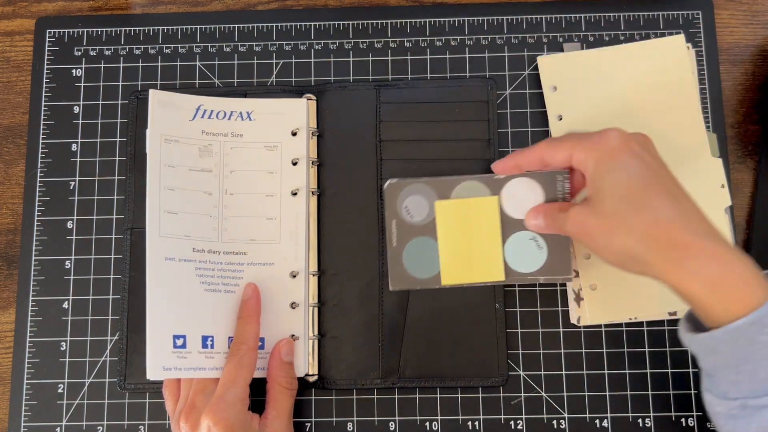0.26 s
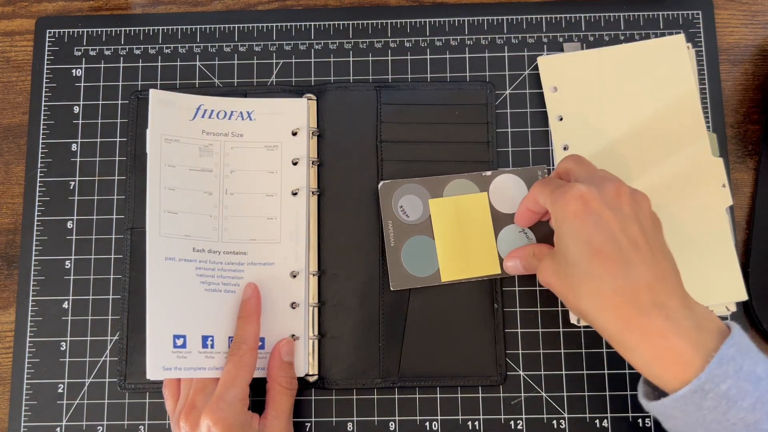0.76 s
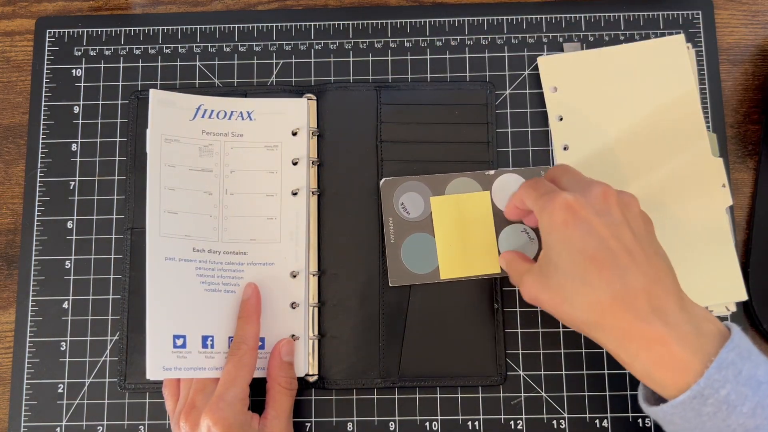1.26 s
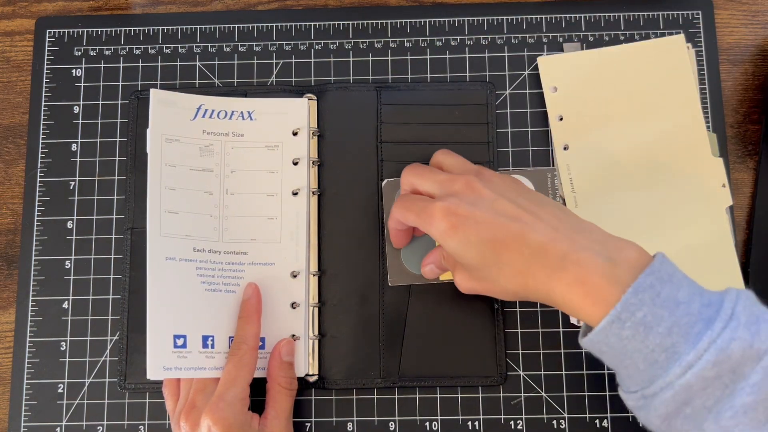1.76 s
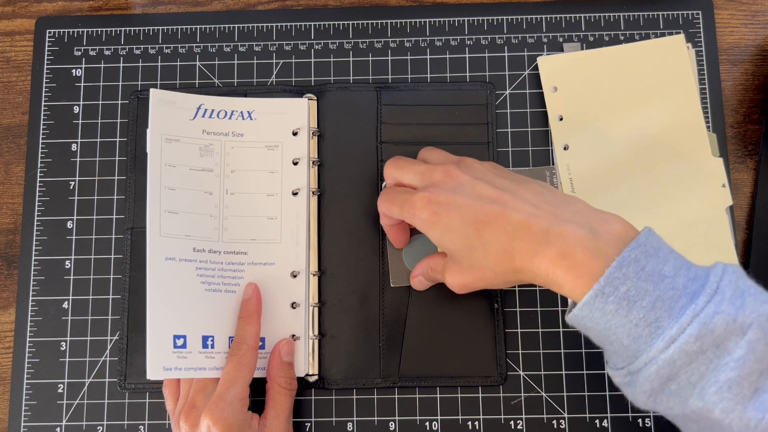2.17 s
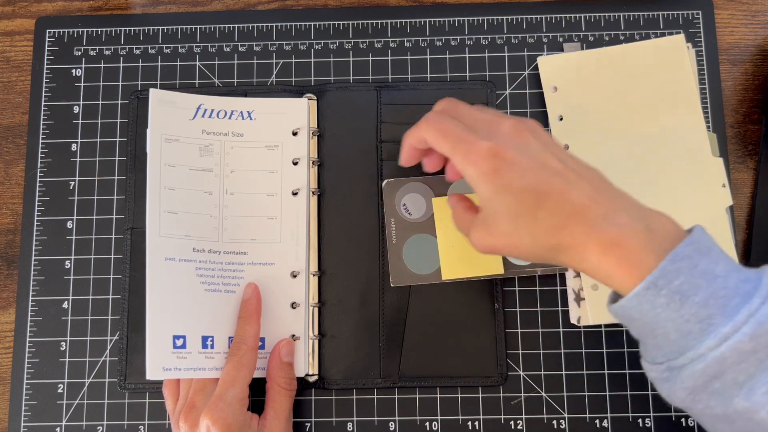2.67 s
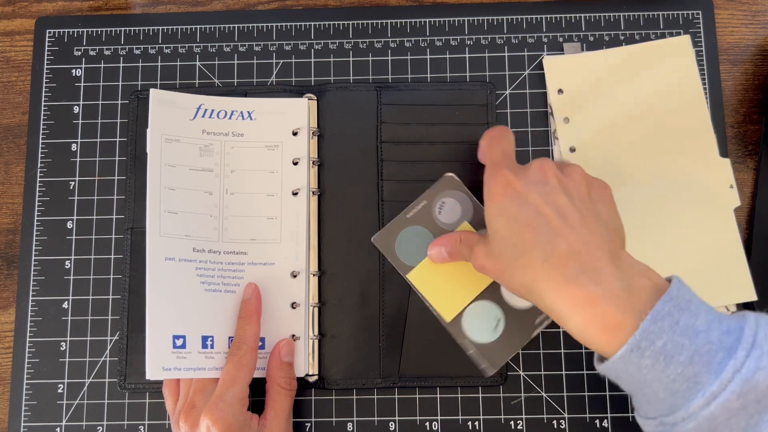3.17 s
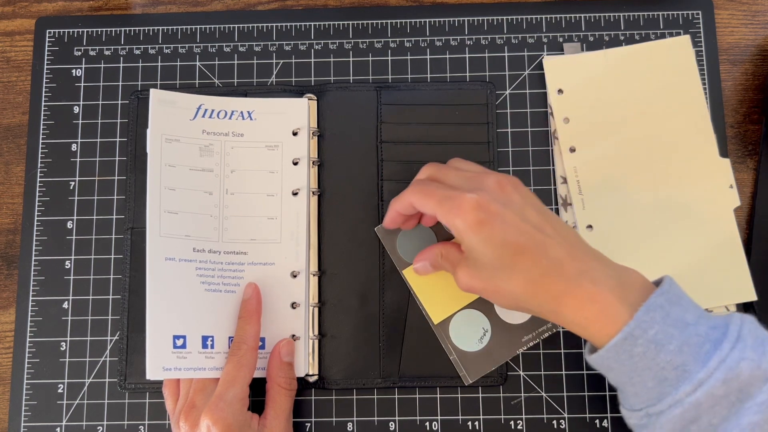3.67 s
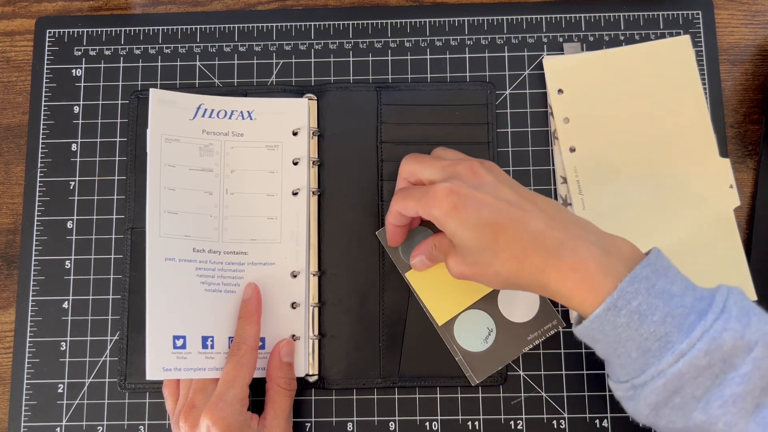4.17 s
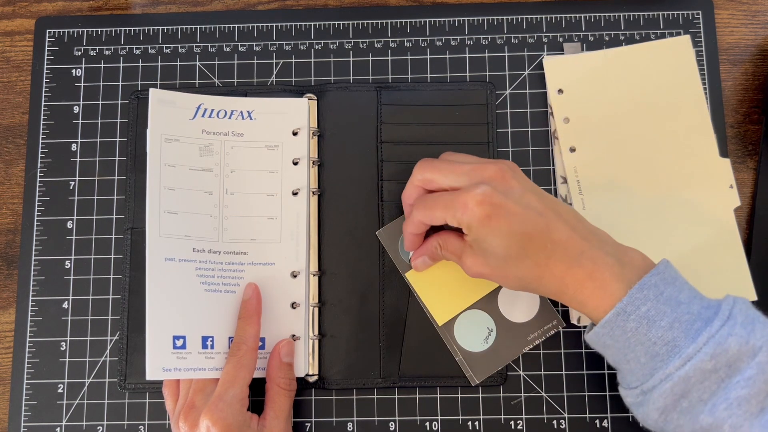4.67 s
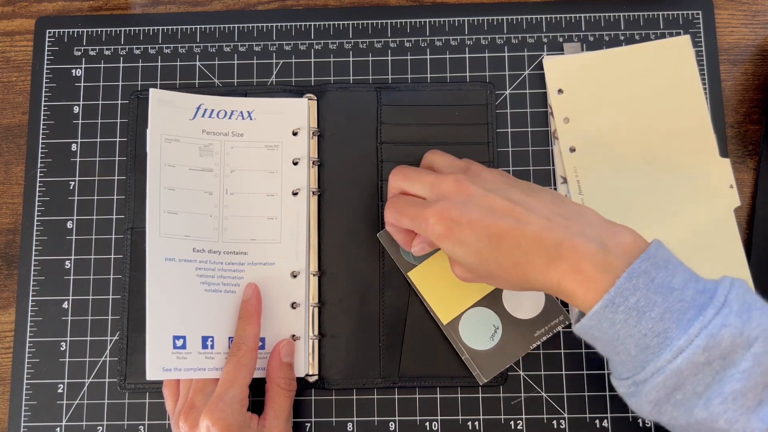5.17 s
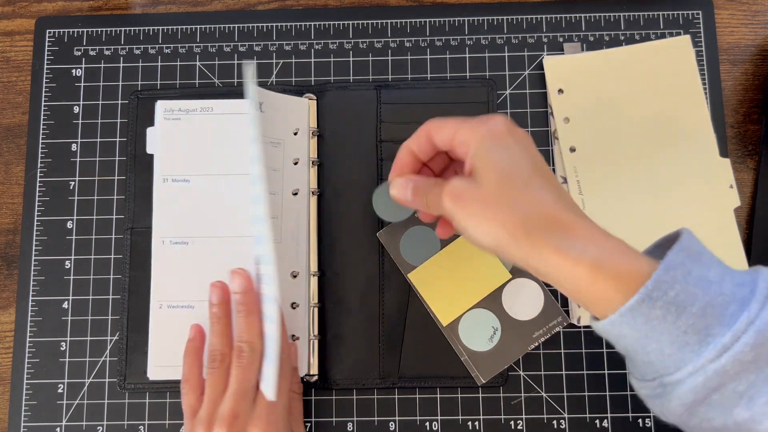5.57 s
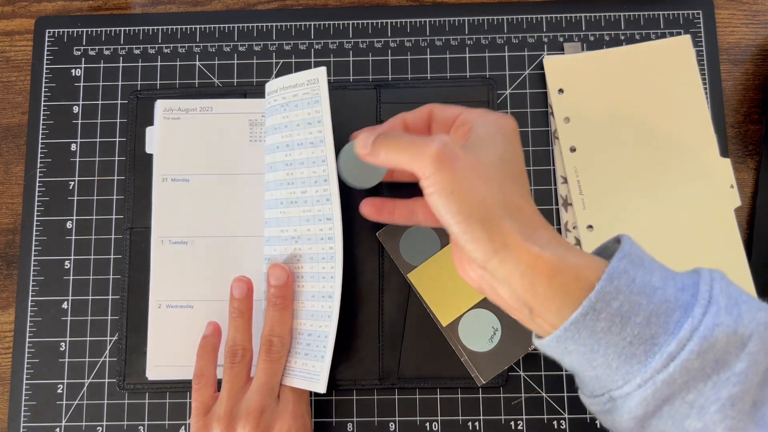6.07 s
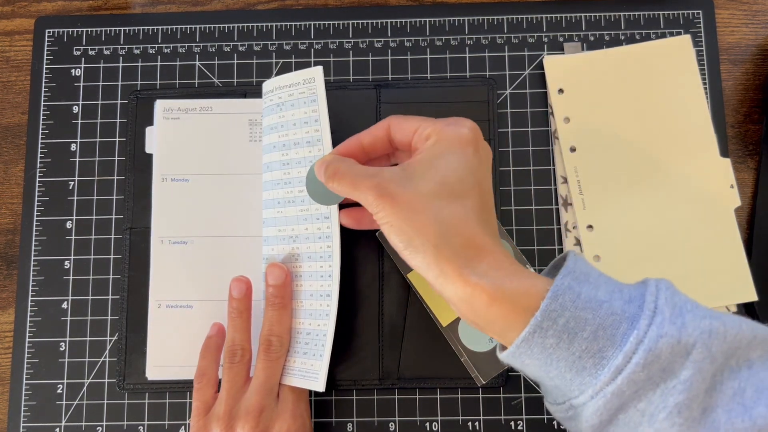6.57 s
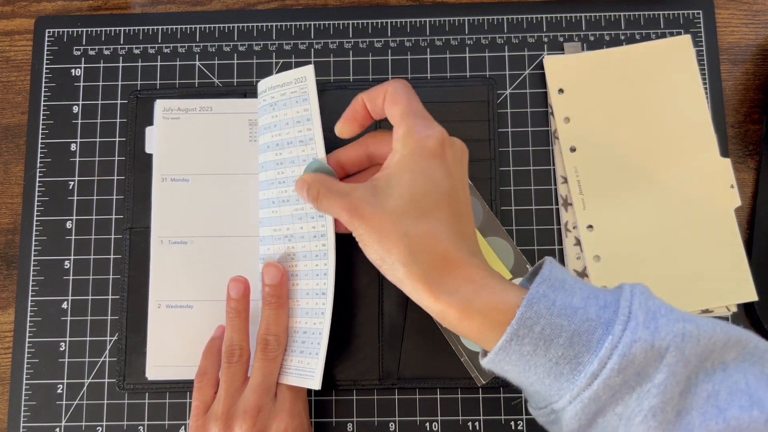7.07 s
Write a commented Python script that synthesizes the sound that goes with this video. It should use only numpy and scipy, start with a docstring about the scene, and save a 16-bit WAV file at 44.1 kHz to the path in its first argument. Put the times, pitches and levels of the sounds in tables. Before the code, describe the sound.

Light plastic clicks open, then sparse nail ticks and soft skin-on-card rustles. Around the middle the picking grows busier, with a bright snap, and shortly after five seconds the loudest cluster of crisp snaps and papery swishes marks peeling and page turning. It ends in gentle rubbing. Close microphones, small quiet room, constant low hum and faint hiss.

```python
"""Sticky tabs and paper on a desk

Fingers slide a plastic card of sticky tabs over a desk, pick at the tabs and turn paper pages.
Nails and edges snap: short bursts of force ring decaying modes. Skin and paper rub: coloured noise
swells and fades. A mains hum and a low room rumble stand under it all.
The two microphone ports hear the top of the treble in opposite phase."""
import sys
import numpy as np
from scipy import signal
from scipy.fft import rfft, irfft, next_fast_len
from scipy.io import wavfile
from scipy.ndimage import uniform_filter1d

SR = 44100
rng = np.random.default_rng(int(sys.argv[2]) if len(sys.argv) > 2 else 0)


def materialize(psi):
    """Save the field psi as 16-bit PCM at rate SR to the path in sys.argv[1].

    A 1-D psi becomes a single channel; in a 2-D psi each row is a channel.
    """
    bounded = np.clip(np.atleast_2d(psi).T, -1, 1)
    quanta = np.round(bounded * 32767).astype(np.int16)
    wavfile.write(sys.argv[1], SR, quanta)


N = 322672  # length [samples]
SIZE = next_fast_len(N + SR)  # FFT length, with spare room at the end
HZ = np.maximum(np.arange(SIZE // 2 + 1) * SR / SIZE, 1)  # pitch of each FFT bin


def amp(db):
    """Turn decibels into gain."""
    return 10 ** (np.asarray(db) / 20)


def rms_one(x):
    """Scale to unit rms."""
    return x / np.sqrt(np.mean(x ** 2) + 1e-20)


def on_grid(points):
    """Read a table of (frequency, value) at every FFT bin, straight lines over log frequency."""
    hz, value = np.transpose(points)
    return np.interp(np.log(HZ), np.log(hz), value)


def drift(rate_hz):
    """Smooth random wandering with spread 1: white noise through a two-pole low-pass."""
    r = np.exp(-2 * np.pi * rate_hz / SR)
    noise = rng.standard_normal(N + SR)
    wander = signal.lfilter([1], [1, -2 * r, r * r], noise)
    return rms_one(wander[SR:])  # skip the filter's start


def spread(common, apart, likeness):
    """Build left and right spectra from a shared part and a part with opposite sign in each ear."""
    alike = np.clip(on_grid(likeness), -1, 1)
    shared = np.sqrt((1 + alike) / 2) * common
    opposite = np.sqrt((1 - alike) / 2) * apart
    return shared + opposite * [[1], [-1]]


# Steady tones of the mains hum: (frequency [Hz], rms level [dB])
HUM_LINES = [(119.7, -42), (72.3, -70.5), (167.5, -73.5), (240, -72.5), (351.8, -76), (450, -81.5),
             (465, -82.5)]


def hum():
    """Mains hum: steady sine tones whose levels waver a little, each by itself."""
    t, out = np.arange(N) / SR, 0
    for hz, level_db in HUM_LINES:
        tone = np.sqrt(2) * np.sin(2 * np.pi * (hz * t + rng.random()))
        waver_db = 0.36 * drift(8.0)
        out = out + tone * amp(level_db + waver_db)
    return out


# Rumble and hiss of the quiet room: (frequency [Hz], level per Hz [dB])
ROOM_COLOUR = [(20, -106), (50, -84), (130, -78), (200, -90), (340, -91.5), (400, -97), (480, -95),
               (700, -104), (1400, -115), (2500, -122), (5000, -127), (8000, -126), (10000, -131),
               (13500, -133), (15000, -145)]
# How alike the room is in both ears: (frequency [Hz], likeness [1 same, 0 unrelated, -1 opposite])
ROOM_LIKENESS = [(40, 1), (150, 1), (200, .85), (300, 0.5), (450, 0), (700, -.5), (1200, .0), (2000, 0.2),
                 (5200, 0.06), (6000, 1), (8000, 0.5), (9500, 0)]


def room_tone():
    """Quiet room: smooth stereo noise, coloured by its table."""
    noise = rfft(rng.standard_normal((2, SIZE)))
    common, apart = noise * amp(on_grid(ROOM_COLOUR)) * np.sqrt(SR / 2)
    return irfft(spread(common, apart, ROOM_LIKENESS), SIZE)[:, :N]


# Slides of skin, card and paper that swell, hold and fade: (time of full pressure [s],
# time to gain 30 dB [s, at least 0.006], hold [s], time to lose 30 dB [s, at least 0.04],
# drag level [dB], scuff level [dB], hiss level [dB], air level [dB],
# drag pitch [Hz], scuff pitch [Hz], breadth [octaves])
SLIDES = [(.01, -11, 0.29, 0.3, -76, -94, -103, -95, 1300, 2400, 0.9),
          (0.244, 0.18, 0.074, 0.04, -71.5, -69.5, -67, -62.5, 1430, 3170, 0.42),
          (0.64, 0.1, .005, 0.07, -69, -65, -66.5, -84, 1180, 3460, 0.54),
          (0.73, 0.24, 0.009, 0.08, -93, -67, -76.5, -79, 1370, 3400, 0.29),
          (1.0, .02, 0.035, 0.05, -94, -74, -89.5, -93.5, 1420, 3450, .17),
          (1.268, 0.06, 0.018, 0.06, -85, -57, -64.5, -63, 1910, 3320, 0.18),
          (1.319, 0.32, 0.0069, 0.17, -93, -77, -82, -86.5, 1500, 3440, 0.2),
          (1.569, -0.14, 0.04, 0.09, -75, -75.5, -69, -70.5, 1090, 3800, 0.65),
          (1.633, -0.52, 0.026, 0.12, -68.5, -73.5, -78, -76, 1080, 3650, .43),
          (2.004, 0.04, 0.042, 0, -91, -88.5, -86, -74, 1100, 4470, 0.41),
          (2.223, 0.11, 0.018, 0.13, -72, -73.5, -67, -88, 1060, 4160, 0.75),
          (2.286, 0.25, 0.018, -0.55, -72, -76.5, -76, -74.5, 1090, 3750, 0.58),
          (2.462, 0.76, 0.032, 0.3, -91, -80.5, -101, -83, 1110, 3860, 0.35),
          (2.562, 0.3, .003, 0.04, -72.5, -81, -82, -76, 1290, 3040, 0.33),
          (2.848, 0.24, 0.035, 0.5, -77, -82.5, -84, -81, 1220, 3720, 0.33),
          (2.9, 0.12, 0.033, 0.16, -72, -73.5, -67, -65.5, 1360, 3700, 0.42),
          (3.055, 0.05, 0.041, 0.2, -70.5, -68.5, -64.5, -62, 1256, 3600, 0.38),
          (3.116, 0.24, 0.022, -0.27, -69, -78, -90.5, -89, 1050, 3800, 0.8),
          (3.179, .1, 0.076, -0.16, -72.5, -79, -71.5, -73, 1020, 4200, 0.52),
          (3.637, -0.13, 0.029, -0.02, -73, -79.5, -73, -75, 1000, 3460, 0.41),
          (3.772, 0, 0.016, 0.06, -78, -79, -73.5, -68, 1020, 4190, 0.42),
          (3.908, -0.21, 0.015, -1, -69, -78.5, -73, -82, 1250, 3040, 0.34),
          (4.254, -0.27, .015, -2.1, -73, -86, -84, -81.5, 1240, 3000, 0.24),
          (4.315, 0.03, 0.065, 0.15, -74, -74.5, -76, -70, 1180, 3560, 0.35),
          (4.642, -0.01, 0.018, 0.12, -65.5, -67, -64, -63.5, 1110, 4700, 0.39),
          (4.773, 0.15, 0.0038, -0.05, -67.5, -69, -65, -57, 1100, 4250, 0.43),
          (4.819, 0.03, 0.0027, 0.08, -73, -74.5, -60, -62.5, 1120, 4830, 0.46),
          (4.969, 0.4, 0.031, 0.6, -81.5, -93.5, -82.5, -75, 1040, 3520, 0.23),
          (5.138, 0.1, 0.0087, 0.04, -78, -70, -63.5, -62, 1500, 3930, 0.69),
          (5.279, 0.22, 0.0038, 0.03, -68.5, -67, -63, -59, 1355, 3290, 0.6),
          (5.416, 0.04, 0.0094, 0, -64, -62, -55, -55.5, 1120, 3470, 0.74),
          (5.444, 0.22, 0.074, -0.1, -64.5, -77.5, -77, -82, 960, 3200, 0.48),
          (5.666, 0.54, 0.0028, -0.08, -73.5, -79.5, -73, -74, 1070, 4480, 0.66),
          (5.9, 0.3, 0.025, 0, -72, -72, -70, -65, 1510, 3300, 0.47),
          (6.343, 0.02, 0.011, 0.08, -68.5, -76, -67.5, -61, 1110, 3460, 0.74),
          (6.752, -0.9, 0.021, 0, -80, -99, -94.5, -85, 1400, 2900, 0.44),
          (6.572, 0.5, 0.0032, -0.3, -82.5, -92, -87.5, -83.5, 1510, 2650, 0.45),
          (6.684, 0.15, 0.023, 0.05, -77.5, -86.5, -88, -78.5, 1590, 2900, 0.24),
          (6.939, 0.05, 0.019, 0.6, -70.5, -75.5, -70.5, -67.5, 1440, 3200, 0.65),
          (7.056, 0.15, 0.084, -0.9, -74, -74, -65.5, -62, 1780, 3080, 0.55),
          (7.292, 0.04, .04, -10, -71, -73, -67, -64, 1690, 3070, 0.4)]
# Rustles that a snap sets off at once and that die away: (time [s],
# time to lose 30 dB [s, at least 0.04], drag level [dB], scuff level [dB], hiss level [dB],
# air level [dB], drag pitch [Hz], scuff pitch [Hz], breadth [octaves])
RUSTLES = [(0.342, 0.09, -70, -60, -68, -81, 1230, 3320, 0.72),
           (0.578, -0.02, -81, -72, -63, -85, 1180, 3410, .4),
           (1.11, 0.21, -64.5, -66.5, -74.5, -75, 990, 3450, 0.45),
           (1.519, 0.16, -63.5, -68, -67.5, -79, 1190, 3160, 0.5),
           (2.187, -0.21, -57, -68, -56, -73, 1050, 4230, 0.3),
           (2.389, 0, -77, -96, -74, -96, 980, 4110, 0.44),
           (2.767, 0.35, -76.5, -79, -92, -75.5, 1020, 3750, 0.57),
           (3.619, 0.06, -73, -85.5, -73, -74, 980, 3360, 0.49),
           (3.918, 0.28, -67, -79, -81, -71, 1090, 4240, 0.25),
           (4.04, 0.05, -52.5, -79, -71, -59, 1130, 4500, 0.099),
           (4.094, 0.1, -59.5, -82.5, -76, -64.5, 1040, 3590, 0.17),
           (4.273, 0.18, -70, -60.5, -65, -67, 1210, 3450, 0.56),
           (4.39, 0.06, -90, -78, -74, -67, 1130, 3480, 0.49),
           (5.098, 0.0546, -56.5, -48.5, -45, -49, 1850, 3950, 0.48),
           (5.284, .17, -51, -56, -56, -59, 960, 3520, 0.59),
           (5.553, -0.3, -74, -75, -73, -83, 990, 4000, 0.68),
           (5.722, -0.13, -63.5, -82, -83, -73, 1170, 3550, 0.76),
           (5.754, 0.12, -59.5, -63.5, -62, -55.5, 1210, 3290, 0.88),
           (5.914, 0.25, -69, -74.5, -80.5, -78, 1020, 3950, .06),
           (6.889, 0.5, -74, -84, -80, -67.5, 1520, 2750, 0.46)]


def pressure(s):
    """Power of each rustle and slide at the times s, 1 at full pressure, plus their colour columns."""
    rustle_rise_s, rustle_hold_s = 0.012, 0
    rustles = [(at, rustle_rise_s, rustle_hold_s, *rest) for at, *rest in RUSTLES]
    rows = np.array(rustles + SLIDES)
    at, rise, hold, fall = rows[:, :4].T[:, :, None]
    rise, fall = np.maximum(rise, .006), np.maximum(fall, .04)  # nothing starts or stops dead
    before, after = np.maximum(at - s, 0), np.maximum(s - at - hold, 0)
    db = -30 * (before / rise + after / fall)
    return amp(2 * np.maximum(db, -600)), rows[:, 4:].T


# How alike rubbing and echo are in both ears: (frequency [Hz], likeness [1 same, 0 unrelated])
RUB_LIKENESS = [(500, 0.24), (1000, 0.099), (1500, 1), (2800, 0.78), (3600, 0.91), (5200, 0.3), (6000, 1),
                (8000, 1), (16000, 1)]


def slips(colour, grain_db, crackle):
    """Dense slips of uneven size in one colour, with lone larger catches among them, rms 1."""
    catches_per_s = 220
    grains = rng.standard_normal((2, N)) * amp(grain_db * drift(440))
    caught = rng.random(N) < catches_per_s / SR
    grains[0] *= 1 + crackle * caught
    common, apart = rfft(grains, SIZE) * amp(on_grid(colour))
    return rms_one(irfft(spread(common, apart, RUB_LIKENESS), SIZE)[:, :N])


def focus(x, s, centre_hz, breadth):
    """A resonance that moves with the free length of card; it keeps the loudness."""
    hz, t, cells = signal.stft(x, SR, nperseg=256)
    octaves = np.maximum(np.interp(t, s, breadth), .04)
    centre = np.interp(t, s, centre_hz)
    off = np.log2(np.maximum(hz[:, None], 1) / centre) / octaves
    bump = 1 / np.sqrt(1 + off ** 4)
    mean_power = np.mean(np.abs(cells) ** 2, axis=(0, 2))[:, None]
    power_kept = np.sum(mean_power * bump ** 2, axis=0) / np.sum(mean_power)
    bump /= np.sqrt(power_kept)
    return signal.istft(cells * bump, nperseg=256)[1][:, :N]


# Colour of each kind of rubbing, low to high: (frequency [Hz], relative level per Hz [dB])
DRAG_COLOUR = [(350, -34.5), (650, 5), (900, 1), (2100, -1), (2500, -3.5), (3200, -43)]
SCUFF_COLOUR = [(1500, -42), (2200, 2.5), (3400, -4), (4600, -1), (5100, -7.5), (6500, -37)]
HISS_COLOUR = [(4200, -45), (5300, 5), (5800, 3.5), (6800, 3.5), (8500, 3.5), (9500, -2), (11500, -43.5)]
AIR_COLOUR = [(7000, -37.5), (9000, -5), (11000, 5.5), (14500, -0.5), (15800, -2), (16200, -42.5)]


def rubbing(flutter_db, scratch_db):
    """Drag, scuff, hiss and air add the power of all contacts; louder ones steer pitch and breadth."""
    s = np.arange(0, N / SR + .001, .001)
    power, (*levels, drag_hz, scuff_hz, octaves) = pressure(s)
    shares = [amp(2 * level_db)[:, None] * power for level_db in levels]

    def blend(share, value):
        """Average over the contacts, weighted by their power."""
        return np.sum(share * value[:, None], axis=0) / np.sum(share, axis=0)

    drag = slips(DRAG_COLOUR, grain_db=0.5, crackle=6)
    drag = focus(drag, s, blend(shares[0], drag_hz), blend(shares[0], octaves))
    scuff = slips(SCUFF_COLOUR, grain_db=0.5, crackle=6)
    scuff = focus(scuff, s, blend(shares[1], scuff_hz), blend(shares[1], octaves))
    hiss = slips(HISS_COLOUR, grain_db=1.0, crackle=6)
    air = slips(AIR_COLOUR, grain_db=1.5, crackle=4.7)
    t, out = np.arange(N) / SR, 0
    for layer, share in zip((drag, scuff, hiss, air), shares):
        loudness = np.sqrt(np.sum(share, axis=0))
        out = out + layer * np.interp(t, s, loudness)
    # flutter and scratches catch all colours at once
    stroke = amp(flutter_db * drift(30)) * rms_one(amp(scratch_db * drift(160)))
    return stroke * out


def patchy(x, patch_db):
    """The contact keeps changing shape, so narrow bands swell and fade by chance."""
    cells = signal.stft(x, nperseg=256)[2]
    field = rng.standard_normal(cells.shape[1:])
    field = uniform_filter1d(field, size=3, axis=0)  # over neighbouring bands
    field = uniform_filter1d(field, size=25, axis=1)  # over time
    return signal.istft(cells * amp(patch_db * rms_one(field)), nperseg=256)[1][:, :N]


def ring(force, hz, t60):
    """One decaying mode for each row of force, at a pitch of its own: a two-pole resonator."""
    r, w = amp(-60 / (t60 * SR)), 2 * np.pi * hz[:, None] / SR
    back = np.exp(-2j * np.pi * np.arange(2049) / 4096)  # a delay of one sample
    response = np.sin(w) * back / (1 - 2 * r * np.cos(w) * back + (r * back) ** 2)
    return irfft(rfft(force, 4096) * response, 4096)


# Snaps of nail, card and page: (time [s], thud peak [dB], card peak [dB], crack peak [dB],
# thud pitch [Hz], card pitch [Hz], crack pitch [Hz], burst length [ms],
# optional: fall-off of thud and card modes away from the pitch [dB per octave])
SNAPS = [(0.165, -68, -58.5, -64, 1010, 2242, 7420, 6.3),
         (0.336, -49, -33, -33.5, 1620, 3130, 5650, 0.8, 14),
         (0.341, -56.5, -37, -39, 1010, 3400, 6800, 0.8), (0.346, -48.5, -44, -49, 1010, 3199, 6800, 1.5),
         (0.386, -67, -75, -53.5, 770, 2220, 6939, 2), (0.588, -66, -55, -51, 1000, 2980, 6500, 1.5),
         (0.633, -66, -52, -63, 1000, 3120, 6038, 1), (0.573, -49, -36, -39, 1050, 2400, 5530, 1, 7),
         (0.605, -56, -54, -59, 832, 3800, 5820, 1.3), (0.623, -53, -35, -41, 1020, 3323, 6970, 1, 18),
         (0.65, -51.5, -42, -52, 810, 3480, 6140, 1), (0.696, -61.5, -61, -55, 1010, 2360, 7600, 1.7),
         (0.953, -80, -66, -73, 783, 3329, 6260, 1.6), (1.11, -37, -36.5, -44.5, 1316, 3500, 5900, 1.5, 9),
         (1.112, -43, -48, -69, 320, 3460, 5600, 2, 8), (1.266, -78, -49, -71, 751, 3356, 6500, 1.2),
         (1.279, -72, -49.5, -45.5, 751, 3330, 6430, 2.8), (1.285, -81, -53, -62, 751, 3400, 6400, 3, 20),
         (1.296, -78, -62, -44, 751, 3510, 6360, 1.5), (1.318, -76, -77, -55.5, 861, 3360, 6890, 3.3),
         (1.518, -49.5, -52, -54, 1040, 3610.5, 6852, 4.1), (1.607, -49, -46, -49, 1050, 4150, 5740, 2.5),
         (1.652, -52.5, -53.5, -50, 959, 2730, 6700, 4.2),
         (2.182, -39, -35, -24.5, 1240, 4004, 6878, .8, 3), (2.196, -52, -56, -48, 1200, 4200, 7000, 2),
         (2.385, -51, -50.5, -46, 910, 3800, 7640, 1.64), (2.545, -61, -64, -59, 1180, 2420, 5770, 1.5),
         (2.763, -57, -74, -67, 1110, 2530, 5399.5, 3.9), (2.905, -55.5, -72, -55, 1140, 3301, 5500, 2.3),
         (2.924, -82, -56, -72, 1460, 2150, 6550, 1.6), (2.981, -64, -63.5, -73, 1300, 2600, 6000, 1),
         (3.098, -55, -66, -68, 1050, 2600, 6000, 2), (3.117, -67, -59, -70, 1200, 3028, 6000, 2),
         (3.194, -53, -67, -55.5, 1190, 2750, 7140, 3.4), (3.614, -55.5, -54, -54, 1060, 2570, 8369.5, 1.4),
         (3.918, -48, -58, -45, 1350, 3800, 10398, 1.3, 16),
         (3.996, -61.5, -85, -64, 1040, 2068.5, 10100, 1.4),
         (4.037, -45.5, -68, -55, 1300, 4000, 10100, 1.5, 43),
         (6, -58.5, -78, -77, 1250, 4000, 10197, 2, 27), (4.063, -59, -82, -75, 1298, 4000, 10200, 1.5, 32),
         (4.088, -55, -84, -62, 1000, 2050, 10250, 2, 25), (4, -56, -80, -75, 1199.5, 2097, 9300, 3, 32),
         (4.102, -57, -71, -76, 890, 2110, 9320, 1.6), (4.272, -37.5, -31, -19.5, 1330, 3090, 10570, .9, 6),
         (4.285, -65, -64, -38, 832, 2900, 5109, 2.4), (4.359, -52, -66, -52, 934, 2990, 5320, 0.92),
         (4.38, -63.5, -71.5, -70, 1260, 3400, 9000, 1), (4.387, -48, -49, -36.5, 1190, 3440, 8499, 1.2),
         (4.724, -67, -69, -54, 1290, 4623, 11101, 1.5), (4.762, -72, -66, -51.5, 1270, 3419.5, 7950, 3.6),
         (4.822, -63, -80, -43, 764, 4688, 6940, 1.35), (4.967, -62, -82, -63, 780, 2000, 8200, 2.1),
         (5.088, -61, -64, -44, 751, 2029, 9200, 1.6), (5.097, -56.5, -46, -42, 1220, 4597, 6980, 4.5, 10),
         (5.28, -60, -62, -39.5, 1030, 2180, 7990, 3.7), (5.288, -25, -33.5, -22, 980, 3277, 6718, 1.66, 8),
         (5.294, -33.5, -35, -36, 970, 3940, 6900, 1.6),
         (5.429, -31.5, -39, -35, 1300, 2330, 5540, 1.16, 14), (5.441, -53, -70, -73, 1300, 2400, 5800, 4),
         (5.465, -64, -77, -80, 1200, 2400, 5760, 2.5), (5.512, -51.5, -80, -84, 1250, 2060, 5830, 3),
         (5.539, -51, -70, -43.5, 1500, 2807, 7598, 7.2),
         (5.55, -37.5, -38.5, -32, 1598, 2070, 5525, 2.2, 13.5),
         (5.554, -46.5, -75, -75, 640, 2087, 5597, 3.4), (5.719, -53.5, -73, -43, 990, 2212, 11000, 2.2),
         (5.752, -52, -61, -40, 1480, 2200, 7200, 4), (5.912, -45, -55, -70, 960, 2100, 5500, 2, 6),
         (5.91, -60, -37, -43, 1130, 3930, 5202, 2, 35), (6.261, -78, -81, -68, 800, 3470.5, 8500, 3),
         (6.345, -61, -62.5, -58.5, 1100, 3900, 6240, 4), (6.622, -76, -69.5, -74, 759, 3501, 7999, 1.2),
         (6.691, -64, -65, -81.5, 800, 2000, 5100, 1.5), (6.965, -61, -55, -48, 1030, 2071, 8050, 3.8),
         (7.112, -64, -65, -72, 1600, 2100, 5800, 2)]
# What the card and page ring with: (frequency [Hz], relative level [dB], time to lose 60 dB [s])
THUD_MODES = [(306, -9.5, 0.018), (584, -2, 0.019), (883, -7, 0.01), (960, 0.5, 0.013), (1320, 2, 0.007),
              (1700, 5, 0.004)]
CARD_MODES = [(2080, 2, 0.0035), (2590, 2, 0.0035), (3450, 3, 0.0045), (4400, 3, 0.0035)]
CRACK_MODES = [(5660, 0, 0.0062), (6900, 4, 0.0049), (8560, 8.5, 0.0013), (10220, 8, 0.0046),
               (11600, 10, 0.003), (13760, 2, 0.0029), (15100, -9, 0.0011), (15900, -4, 0.0018)]


def snaps(scatter_db, tick, thud_lag_ms, low_cut_hz):
    """Uneven bursts of force ring modes; the grip shifts them so the nearest lands on the pitch."""
    usual_focus_db, crack_focus_db = 13, 9  # fall-off away from the pitch [dB per octave]
    rows = np.array([(*row, usual_focus_db)[:9] for row in SNAPS])
    out, steps = np.zeros(N + 4096), np.arange(900)
    length_ms = np.clip(rows[:, 7:8], .2, 10)
    phase = steps / SR / (length_ms / 1000)
    bursts = rng.standard_normal(phase.shape) * phase * np.exp(-2 * phase)
    bursts /= np.sqrt(np.sum(bursts ** 2, axis=1, keepdims=True))
    bursts[:, 12] += tick / length_ms[:, 0]  # the first break, sharpest in short snaps
    for column, modes in enumerate([THUD_MODES, CARD_MODES, CRACK_MODES], start=1):
        luck = rng.standard_normal((len(rows), len(modes)))
        pitch = rows[:, column + 3]
        octaves_off = np.log2(np.array(modes)[:, 0] / pitch[:, None])
        nearest = np.abs(octaves_off).argmin(axis=1)[:, None]
        octaves_off -= np.take_along_axis(octaves_off, nearest, axis=1)
        focus_db = rows[:, 8] if column < 3 else crack_focus_db
        sound = 0
        for k, (_, level_db, t60) in enumerate(modes):
            mode_hz = np.minimum(pitch * 2 ** octaves_off[:, k], .45 * SR)
            rung = ring(bursts, mode_hz, t60)
            swing = np.abs(rung).max(axis=1)
            swing = np.maximum(swing, .7 * np.median(swing))  # weak swings are not forced up
            gain = amp(level_db - focus_db * np.abs(octaves_off[:, k]) + scatter_db * luck[:, k])
            sound = sound + rung * (gain / swing)[:, None] * (-1) ** k
        lag_ms = thud_lag_ms if column == 1 else 0  # the body answers after the edge
        start = rows[:, :1] + lag_ms / 1000
        peak = amp(rows[:, column]) / np.abs(sound).max(axis=1)
        np.add.at(out, (start * SR).astype(int) + np.arange(4096), sound * peak[:, None])
    # a small card radiates no bass
    low_cut = signal.butter(2, low_cut_hz, "high", fs=SR, output="sos")
    return signal.sosfilt(low_cut, out[:N])


# Balance of direct sound and bounce in the snaps: (frequency [Hz], likeness [1 direct only, 0 equal])
SNAP_LIKENESS = [(300, 0.91), (600, 0), (1000, 0.8), (2500, 1), (3600, 0.97), (5200, 0.3), (6000, 1),
                 (16000, 0.7)]


def placed(x, bounce_ms):
    """A bounce off the desk top adds to one ear and takes from the other."""
    direct = rfft(x, SIZE)
    bounce = -direct * np.exp(-2j * np.pi * HZ * bounce_ms / 1000)
    return irfft(spread(direct, bounce, SNAP_LIKENESS), SIZE)[:, :N]


def echo(x):
    """The small room answers with a dying, dulled wash of noise, partly different in each ear."""
    t60_s, level_db, cut_hz, start_s = 0.2, -12, 18000, 0.0057
    t = np.arange(SR // 2) / SR
    decay = amp(-60 * t / t60_s) * np.clip(t / start_s, 0, 1) ** 2
    noise = rng.standard_normal((2, len(t))) * decay / np.sqrt(np.sum(decay ** 2))
    common, apart = rfft(noise, SIZE)
    wash = spread(common, apart, RUB_LIKENESS) / np.sqrt(1 + (HZ / cut_hz) ** 2)
    return amp(level_db) * irfft(rfft(x, SIZE) * wash, SIZE)[:, :N]


def scene():
    """Hands at work over the hum and the room; only the snaps are echoed."""
    rustle = patchy(rubbing(flutter_db=1.03, scratch_db=0.7), patch_db=2.0)
    hits = snaps(scatter_db=2.0, tick=1.17, thud_lag_ms=.5, low_cut_hz=310)
    return hum() + room_tone() + rustle + placed(hits, bounce_ms=0.93) + echo(hits)


# Phase by which the left port leads the right: (frequency [Hz], phase [radians])
PORT_PHASE = [(3600, 0), (4600, -.8), (5300, .8), (6000, 0), (7500, -.1), (9000, -1.1), (11000, -2.1),
              (13000, -3.1), (17000, -3.14)]


def record(dry):
    """The ports turn the phase of each side by half their difference; the top is cut."""
    turn = np.exp(.5j * on_grid(PORT_PHASE) * [[1], [-1]])
    heard = irfft(rfft(dry, SIZE) * turn, SIZE)[:, :N]
    top_cut = signal.cheby2(20, 60, 17100, fs=SR, output="sos")  # 60 dB down from 17100 Hz up
    return signal.sosfilt(top_cut, heard)


dry = scene()
out = record(dry)
materialize(out)
```